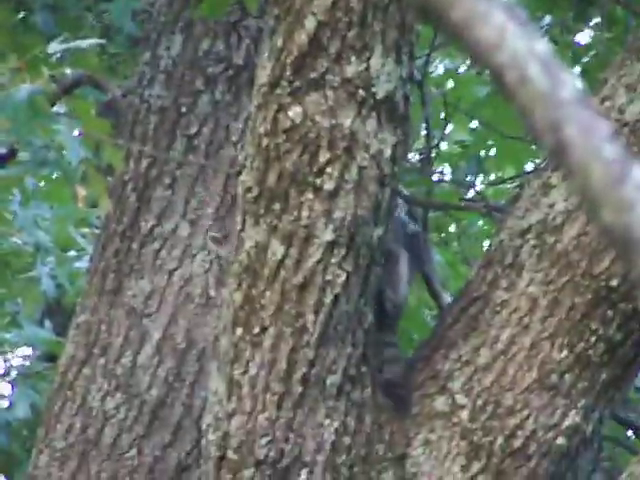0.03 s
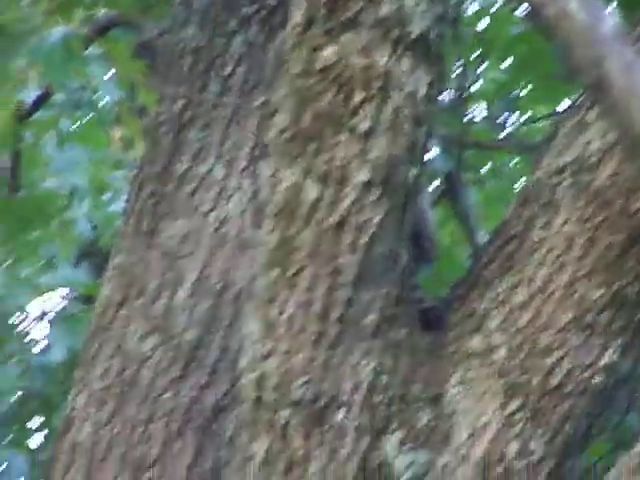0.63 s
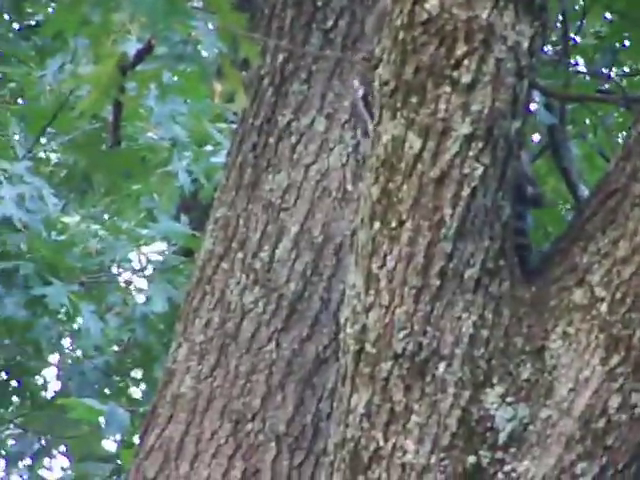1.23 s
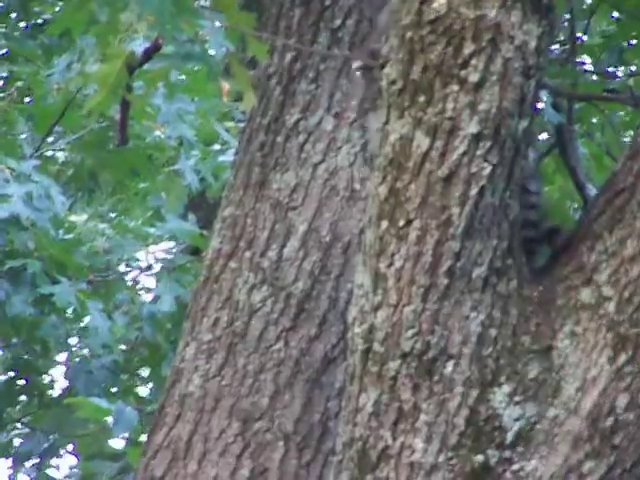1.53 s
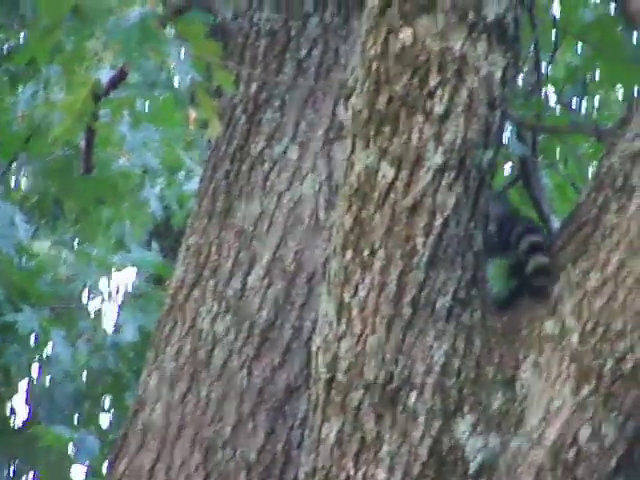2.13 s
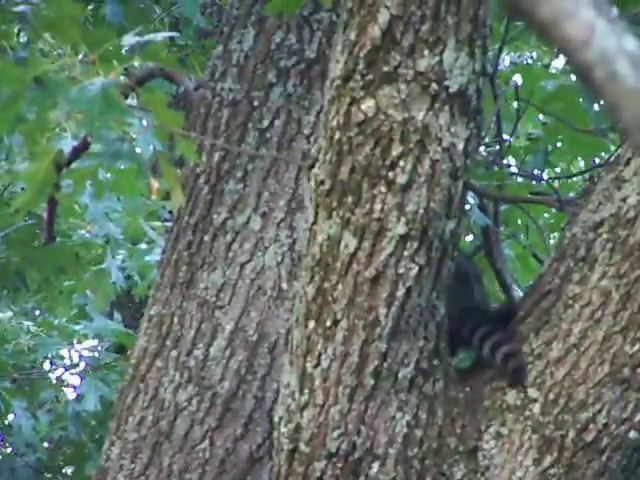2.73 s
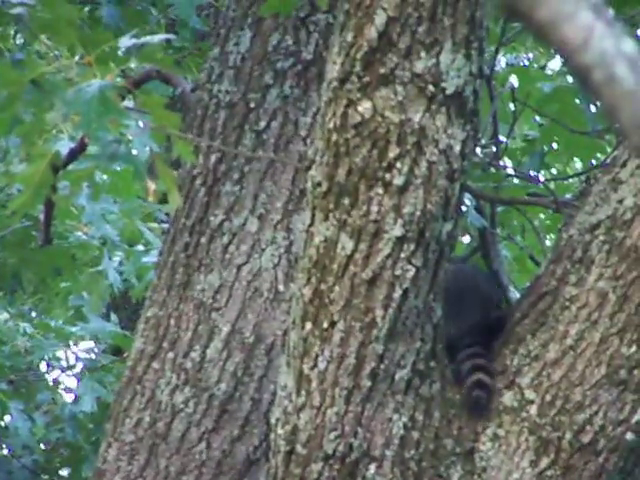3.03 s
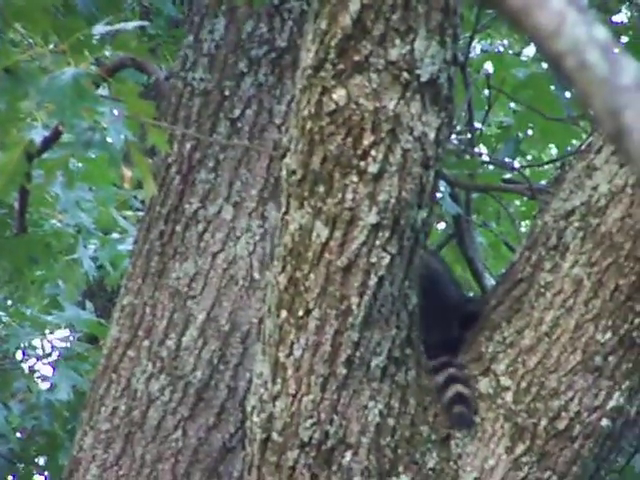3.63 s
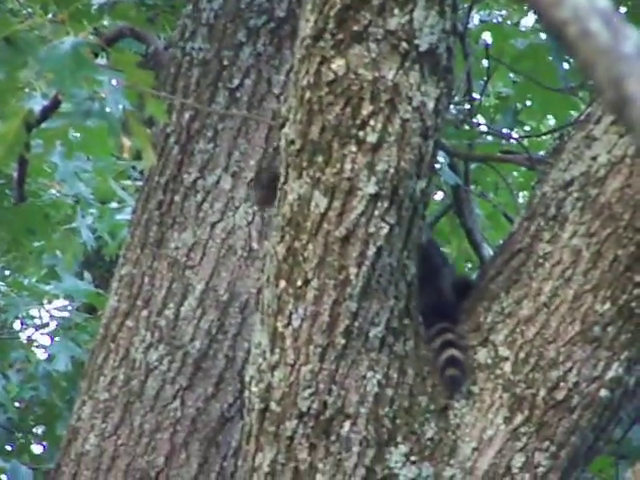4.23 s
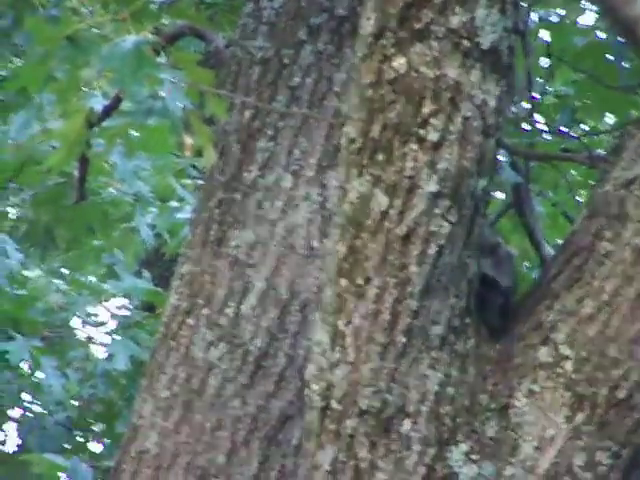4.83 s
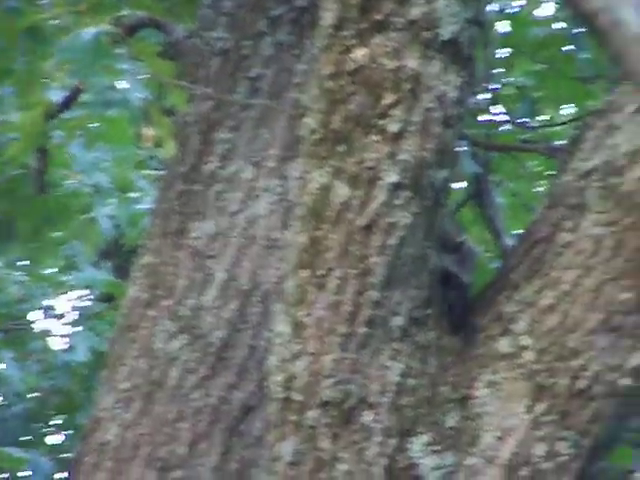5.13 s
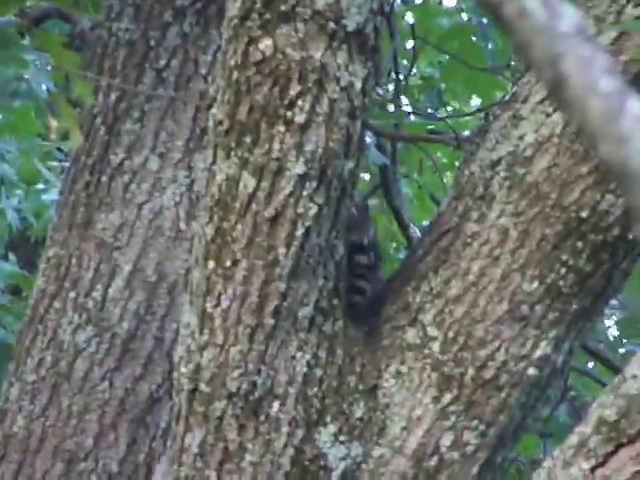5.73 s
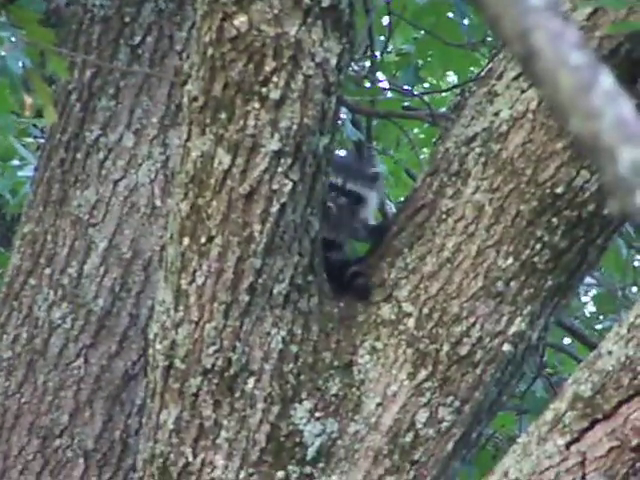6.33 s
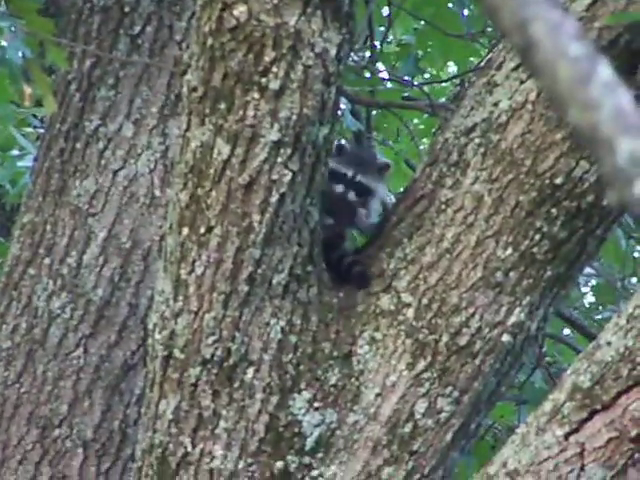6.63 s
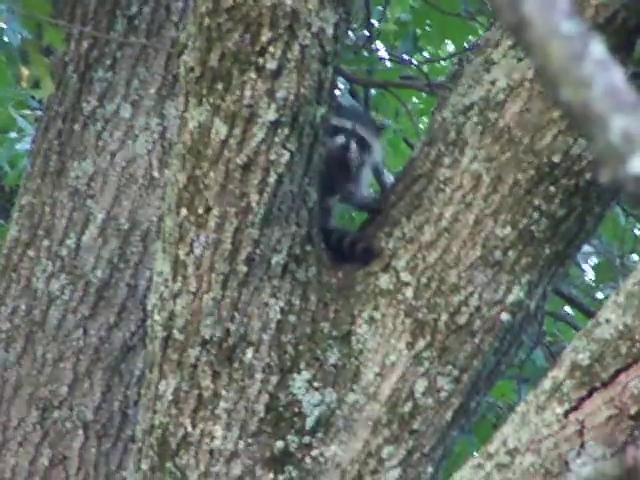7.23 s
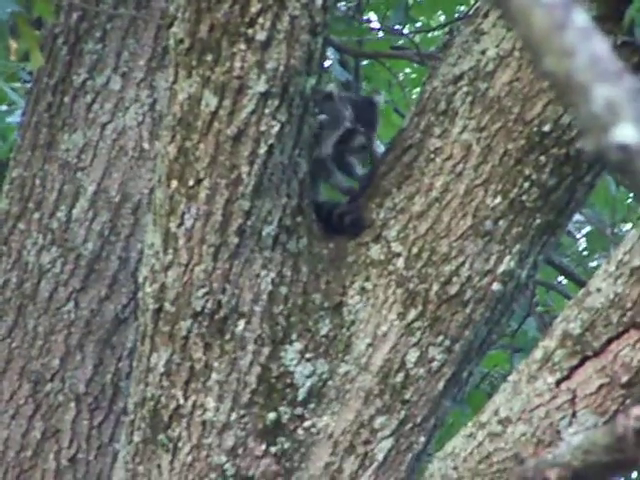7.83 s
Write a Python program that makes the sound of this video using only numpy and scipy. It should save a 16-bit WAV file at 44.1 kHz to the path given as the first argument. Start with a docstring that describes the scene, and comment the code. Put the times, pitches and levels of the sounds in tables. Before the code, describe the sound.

A dense, high cicada hiss fills a summer wood for all eight seconds, over a soft, low rush of air and the faint wavering hum of a distant motor. One nearer cicada swells from a rasp into a throbbing whistle about every 0.7 seconds, starting at 0.3, strongest around 1.7, then weaker until its last swell at 5.6. A bird gives very short, raspy rising chips, slightly smeared by the trees, near 0.2, 0.7, 1.9, 3.4, 3.9 and 4.8 seconds, then more often from 6.1 to 7.4. Faint, very high ticks are scattered throughout, and two brief dry scratches come at 3.1 and 5.7 seconds. The chorus, air and motor sink together around 4.3 seconds, come back at 5.1 and sink again by 6, after which the insect hiss keeps fading gently.

```python
"""A summer wood: the clicking tymbals of a cicada chorus merge into a hiss in the crowns, and one
nearer cicada swells from rasp to whistle about every 0.7 s. A bird's short rising chips scatter off
the trees. There are faint, very high ticks and two short scratches, and a distant motor hums under
the low rush of air. Chorus, air and motor sink, come back and sink again."""
import sys
import numpy as np
from scipy import signal
from scipy.fft import rfft, irfft, next_fast_len
from scipy.io import wavfile
from scipy.ndimage import uniform_filter1d

SR = 44100
rng = np.random.default_rng(int(sys.argv[2]) if len(sys.argv) > 2 else 0)


def waveform_to_disk(signal):
    """Save audio, clipped to [-1, 1], as 16-bit WAV at the path in sys.argv[1]."""
    frames = np.transpose(np.atleast_2d(signal))
    scaled = np.clip(frames, -1, 1) * 32767
    samples = np.round(scaled).astype(np.int16)
    wavfile.write(sys.argv[1], SR, samples)


N = 352359
TIME = np.arange(N) / SR

# swells of the near cicada: (time [s], rasp level [dB], whistle level [dB])
CICADA_SWELLS = [(.265, -32, -35), (.945, -33, -32.5), (1.654, -31.5, -29), (2.315, -32, -32),
                 (2.94, -36.5, -33), (3.682, -34.5, -38), (4.4, -38.5, -46), (5.055, -38.5, -37),
                 (5.64, -38, -46)]


def chorus(db=-36.5, tire_s=5.7, fade_db_per_s=2.5, ridge_width_hz=330, flutter_db=.26):
    """Countless tymbals merge into a hiss; as they tire it fades and its ridge sinks and flattens."""
    # colour of the chorus: (frequency [Hz], relative level [dB])
    spectrum = [(2000, -40.5), (2600, -15), (3000, -9), (3300, 0), (3550, 2.5), (4000, -1), (4400, 1),
                (5000, 0), (5450, -2), (6250, -3), (6900, -7.5), (7400, -17.5), (7800, -39), (8600, -39.5)]
    # single shrill singers: (pitch [Hz], half width [Hz], boost [dB])
    singers = [(3260, 20, 4), (3610, 36, 1.5)]
    hz = np.fft.rfftfreq(1024, 1 / SR)
    frame_s = np.arange(N // 256 + 5)[:, None] * 256 / SR
    real, imag, broad, fine = rng.standard_normal((4, len(frame_s), len(hz)))
    f, level = np.transpose(spectrum)
    shape_db = np.interp(np.log(hz + 1), np.log(f), level) - 60 * np.clip(hz / f[-1] - 1, 0, 1)
    tired_s = np.maximum(frame_s - tire_s, 0)
    ridge_hz, ridge_db = 4640 - 240 * tired_s, 4 - .7 * tired_s  # where most of the chorus sings
    shape_db = shape_db + ridge_db * np.exp(-.5 * ((hz - ridge_hz) / ridge_width_hz) ** 2)
    shape_db += sum(boost * np.exp(-.5 * ((hz - pitch) / width) ** 2) for pitch, width, boost in singers)
    for noise, depth_db, frames, bins in (broad, .5, 16, 8), (fine, 1.72, 40, 2):  # voices come and go
        patches = uniform_filter1d(uniform_filter1d(noise, frames, axis=0), bins, axis=1)
        shape_db += depth_db * unit(patches)
    hiss = signal.istft(((real + 1j * imag) * amp(shape_db)).T, nperseg=1024, noverlap=768)[1][:N]
    hiss /= np.sqrt(uniform_filter1d(band(hiss, 4400, 7200) ** 2, SR // 2))  # holds the treble steady
    fade_db = fade_db_per_s * np.maximum(TIME - tire_s, 0)
    return amp(db - fade_db + flutter_db * drift(40)) * hiss


def cicada_rasp(click_hz=387, jitter=.09, sag_hz=30, half_width_s=.062):
    """Tymbal clicks ring the near cicada's body, whose pitch sags through each swell."""
    # body resonances: (pitch [Hz], bandwidth [Hz], relative level [dB], swell delay [s])
    body = [(3085, 400, -3.5, 0.005), (3350, 220, -3.5, 0.0032), (3783, 130, -4, 0.053),
            (4154, 340, -0.5, -0.048)]
    swells = [((TIME - s) / half_width_s, db) for s, db, _ in CICADA_SWELLS]
    sag = -sag_hz * sum(u * bell(u) for u, _ in swells)
    effort = sum(amp(db) * bell(u) for u, db in swells)
    turns = np.cumsum(click_hz * (1 + jitter * drift(300))) / SR
    clicks = np.diff(np.floor(turns), prepend=0)
    rasp = np.zeros(N)
    for hz, width, db, delay in body:
        ring = resonate(resonate(clicks, hz + sag, width), hz + sag, width)
        ring = trees(ring, t60=.093, wet_db=-1.5)
        rasp += amp(db) * np.interp(TIME - delay, TIME, effort) * unit(ring)
    rasp /= np.linalg.norm(amp([db for _, _, db, _ in body]))
    return band(rasp, 2300, 6000, order=3)


def cicada_whistle(waver_hz=12, throb_db=3.5, half_width_s=.042, lead_s=.0072):
    """At the height of each swell the rasp breaks into clear, throbbing tones."""
    # whistle tones: (pitch [Hz], relative level [dB], swell delay [s])
    tones = [(3850, -1, -0.0054), (4280, -8, -0.036), (3280, -10.5, -0.00085)]
    effort = sum(amp(db) * bell((TIME - s + lead_s) / half_width_s) for s, _, db in CICADA_SWELLS)
    out = np.zeros(N)
    for hz, db, delay in tones:
        throb = amp(throb_db * drift(60))
        tone = np.sin(2 * np.pi * np.cumsum(hz + waver_hz * drift(120)) / SR)
        out += amp(db) * np.interp(TIME - delay, TIME, effort) * unit(throb * tone)
    return out


def bird(gain_db=2.5, start_hz=2200, end_hz=4500, length_s=.021, rough=.11, lead_s=.003):
    """Each chip is one quick, raspy upward sweep, smeared by the trees."""
    # chips: (time [s], relative level [dB])
    chips = [(.185, -42), (.668, -39), (.755, -41), (1.845, -38), (1.95, -38), (3.386, -40.5), (3.463, -41),
             (3.91, -44), (4.674, -39.5), (4.764, -42.5), (4.886, -38), (6.103, -41), (6.187, -42),
             (6.3, -42), (6.428, -44.5), (6.664, -41.5), (6.737, -41), (6.866, -40), (7.26, -41.5),
             (7.353, -43.5)]
    out = np.zeros(N)
    rasp = 1 + rough * drift(1500)
    for (s, db), (pitch, stretch) in zip(chips, rng.standard_normal((len(chips), 2))):
        u = np.linspace(0, 1, round(length_s * np.exp(.15 * stretch) * SR))
        sweep_hz = (1 + .05 * pitch) * start_hz * (end_hz / start_hz) ** u
        turns = np.cumsum(sweep_hz * rasp[round(s * SR):][:len(u)]) / SR
        arch = np.sqrt(np.sin(np.pi * u).clip(0))
        add(out, s - lead_s, np.sqrt(2) * amp(gain_db + db) * arch * np.sin(2 * np.pi * turns))
    return trees(out, t60=.11, wet_db=2.5)


def ticks_and_scratches(tick_gain_db=8, tick_hz=7650, faint_count=28, scratch_decay_s=.0045):
    """Faint, very high ticks, a few clearer than the rest, and two short scratches."""
    # clear, dry ticks: (time [s], relative level [dB])
    clear_ticks = [(.2917, -50), (.3571, -52), (.5626, -46), (1.0654, -48), (1.1862, -52), (1.5618, -49),
                   (3.121, -49), (3.7788, -55), (4.9482, -53), (5.5248, -52)]
    # short scratches: (time [s], relative level [dB])
    scratches = [(3.12, -34), (5.695, -39)]
    out, t = np.zeros(N), np.arange(1024) / SR
    tick = np.hanning(40) * np.sin(2 * np.pi * tick_hz * t[:40])
    faint_ticks = zip(rng.uniform(0, N / SR, faint_count), rng.normal(-58, 3, faint_count))
    for s, db in [*clear_ticks, *faint_ticks]:
        add(out, s, amp(db + tick_gain_db) * tick)
    for s, db in scratches:
        grit = band(rng.standard_normal(len(t)), 800, 3900, order=2)
        add(out, s, 2 * amp(db) * grit * np.exp(-t / scratch_decay_s))
    return out


def far_insects(db=-43, flutter_db=1):
    """A lower, lightly fluttering hiss from deep in the wood."""
    # colour of the farthest insects: (frequency [Hz], relative level [dB])
    spectrum = [(2000, -27.5), (2900, -5.5), (3300, -5), (3550, 3.5), (4100, 1.5), (4600, -6.5),
                (6500, -24), (7300, -26), (7800, -44)]
    return amp(db + flutter_db * drift(25)) * unit(colour(rng.standard_normal(N), spectrum))


def motor(shaft_hz=59.2, buzz_db=-81, waver=.36):
    """Wavering fan and motor tones, and a faint buzz on the multiples of the shaft speed."""
    # motor and fan tones: (pitch [Hz], level [dB], width of pitch wander [Hz])
    hum = [(56.1, -53, 4), (83.8, -56.5, 6), (110.8, -53, 5.2), (118.4, -57.5, 4), (165.2, -52, 3),
           (221.1, -51, 4), (237.8, -50, 3), (276, -56.5, 4), (325, -69.5, 3), (351, -68, 2), (533, -66, 2),
           (996, -67, 5), (2367, -62.5, 6), (2430, -63, 8)]
    # strong shaft harmonics: (multiple, level [dB])
    whine = [(21, -75), (22, -66.5), (25, -62.5), (27, -67.5), (30, -66)]
    out = np.zeros(N)
    for hz, db, width in hum:
        turns = np.cumsum(hz + width / 2 * drift(2 * width + 1)) / SR + rng.random()
        out += amp(db) * (1 + waver * drift(9)) * np.sin(2 * np.pi * turns)
    shaft_turns = np.cumsum(shaft_hz + .021 * drift(1.994)) / SR
    for k in range(12, 40):
        gain = amp(dict(whine).get(k, buzz_db)) * (1 + waver * drift(3))
        out += gain * np.sin(2 * np.pi * (k * shaft_turns + rng.random()))
    return np.sqrt(2) * out


def air():
    """A low, even rush of air from far away, its level set by its midrange."""
    # colour of the rush: (frequency [Hz], relative level [dB])
    spectrum = [(15, -13), (45, 1), (70, -1), (100, -3.5), (128, 2.5), (150, -7), (200, -1), (280, -3),
                (320, -9.5), (480, -9), (700, -14.5), (1000, -13.5), (1300, -17), (2400, -16), (7200, -36)]
    rush = colour(rng.standard_normal(N), spectrum)
    return amp(-48) * rush / np.std(band(rush, 400, 2000))


def trees(x, t60, wet_db):
    """Trunks and leaves scatter a sound into many dying echoes."""
    t = np.arange(SR // 2) / SR
    taps = rng.standard_normal(len(t)) * (rng.random(len(t)) < .1) * (t > .004)
    tail = taps * amp(-60 * t / t60)
    echoes = signal.oaconvolve(x, tail / np.linalg.norm(tail))[:N]
    return (x + amp(wet_db) * echoes) / np.sqrt(1 + amp(wet_db) ** 2)


def amp(db):
    return 10 ** (np.asarray(db) / 20)


def unit(x):
    return x / np.sqrt(np.mean(x ** 2) + 1e-20)


def add(mix, s, sound):
    part = mix[max(round(s * SR), 0):][:len(sound)]
    part += sound[:len(part)]


def band(x, lo_hz, hi_hz, order=4):
    return signal.sosfilt(signal.butter(order, [lo_hz, hi_hz], "band", fs=SR, output="sos"), x)


def colour(x, points):
    """An EQ curve through (frequency [Hz], gain [dB]) points, dying away above the last."""
    hz = np.fft.rfftfreq(2 * next_fast_len(N // 2 + 1), 1 / SR)
    f, db = np.transpose(points)
    gain = amp(np.interp(np.log(hz + 1), np.log(f), db)) / (1 + (hz / (1.1 * f[-1])) ** 40)
    return irfft(rfft(x, 2 * len(hz) - 2) * gain)[:N]


def resonate(x, hz, width):
    """A resonance of gain 1 that follows the curve hz."""
    turn = np.exp(2j * np.pi * np.cumsum(hz) / SR)
    pole = np.exp(-np.pi * width / SR)
    return 2 * (turn * signal.lfilter([1 - pole], [1, -pole], x / turn + 1e-18)).real


def drift(per_s):
    """A random wander of RMS 1 that turns per_s times a second, holding once its knots run out."""
    knots = rng.standard_normal(4096)
    return unit(np.interp(TIME * per_s, np.arange(len(knots)), knots))


def bell(u):
    """A smooth rise and fall, of height 1 at u = 0."""
    return 1 / np.cosh(np.clip(u, -20, 20))


def scene(chorus_share=.99, motor_share=.81, air_db=-3.1, motor_db=-1.5):
    """The bed sinks and returns on one fader, each layer by its share; short sounds sit on top."""
    # fader ride of the bed: (time [s], relative level [dB])
    fader = [(0.0, -46), (0.2, -45), (0.33, -43.5), (0.8, -45.5), (1.25, -43), (1.5, -44), (1.8, -43.5),
             (2.15, -44.5), (2.7, -44.0), (2.97, -47.0), (3.12, -43.0), (3.6, -44.5), (4.35, -49.5),
             (4.87, -49.5), (5.1, -44), (5.7, -47), (6.1, -50), (8.0, -49.5)]
    ride_db = np.interp(TIME, *np.transpose(fader))
    ride_db -= ride_db.mean()
    bed = amp(ride_db) * (amp(air_db) * air() + far_insects())
    bed += amp(motor_share * ride_db + motor_db) * motor()
    bed += amp(chorus_share * ride_db) * chorus()
    return (bed + cicada_rasp() + cicada_whistle() + bird() + ticks_and_scratches())[None]


def record(dry, cutoff_hz=9000):
    """A steep low-pass takes off the top of the treble."""
    low_pass = signal.firwin(511, cutoff_hz, window=("kaiser", 9), fs=SR)
    return signal.oaconvolve(dry, low_pass[None], "same")


dry = scene()
out = record(dry)
waveform_to_disk(out)
```